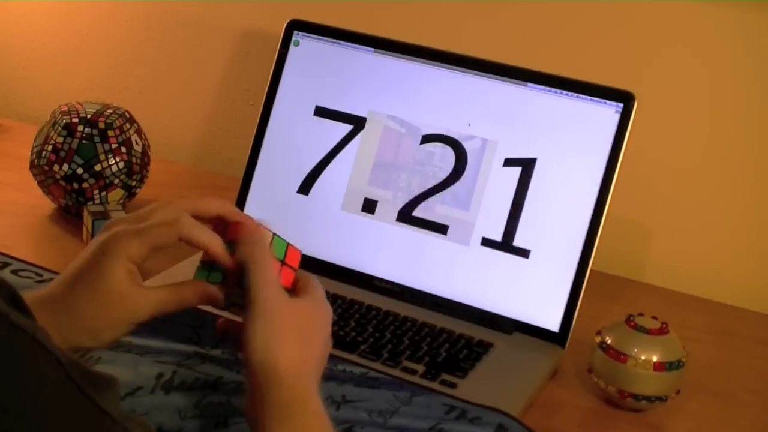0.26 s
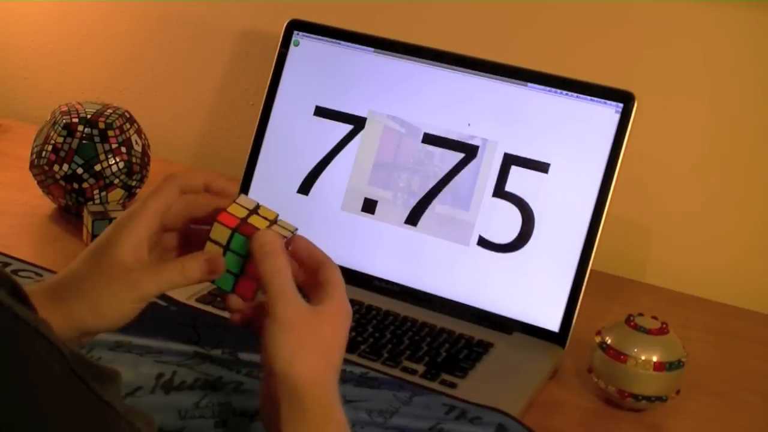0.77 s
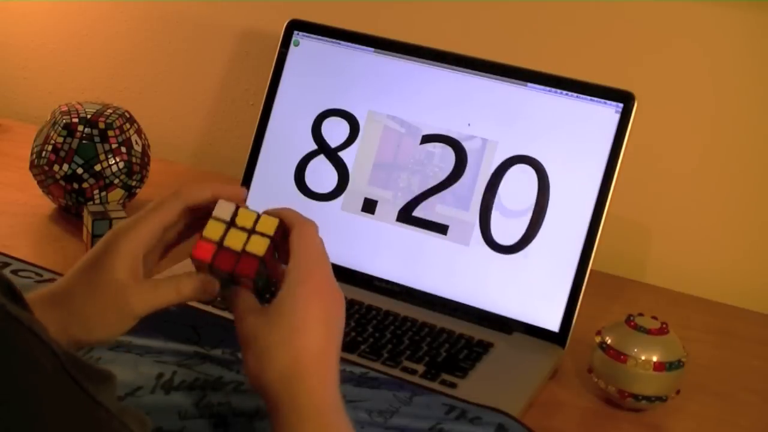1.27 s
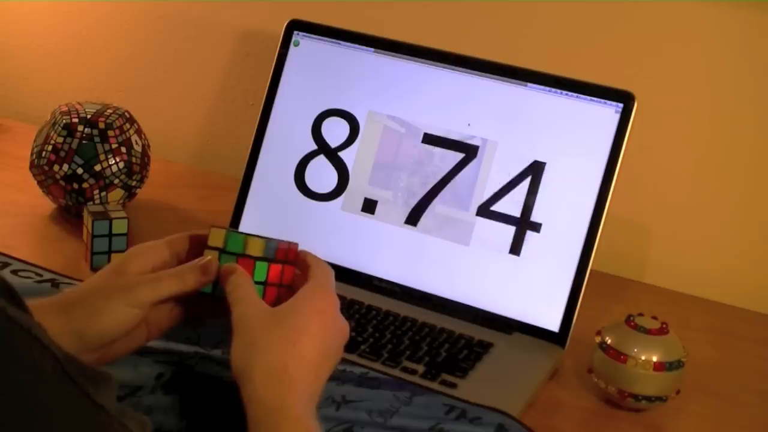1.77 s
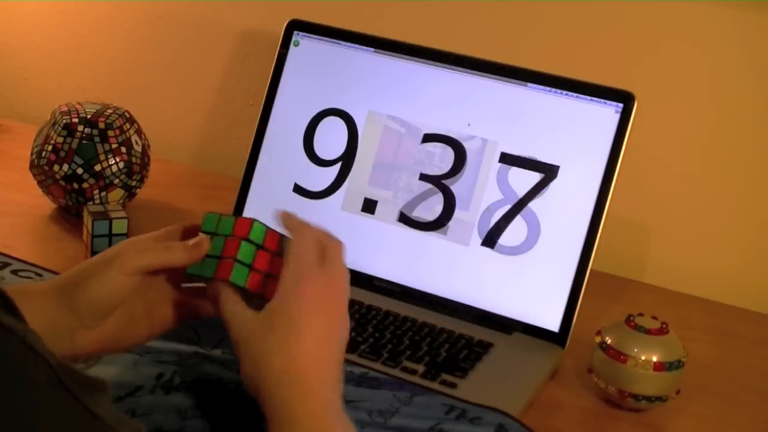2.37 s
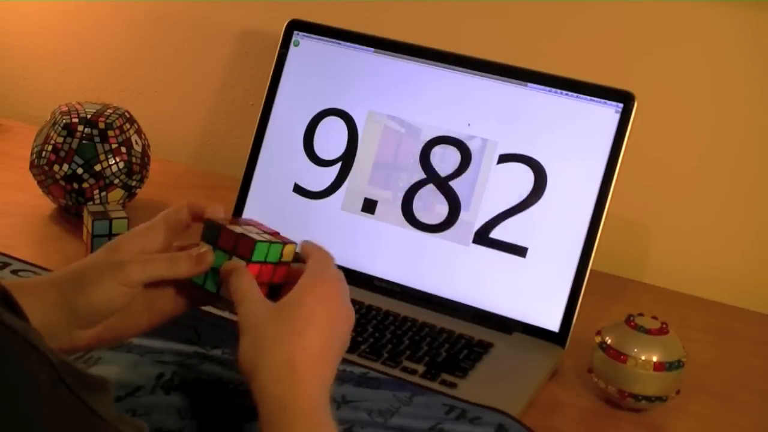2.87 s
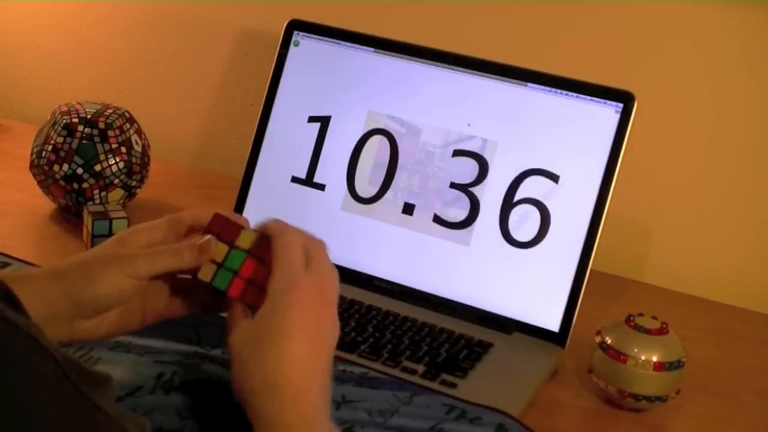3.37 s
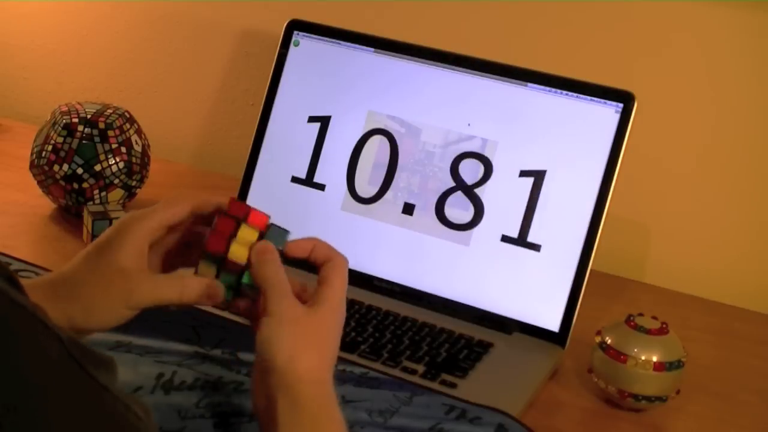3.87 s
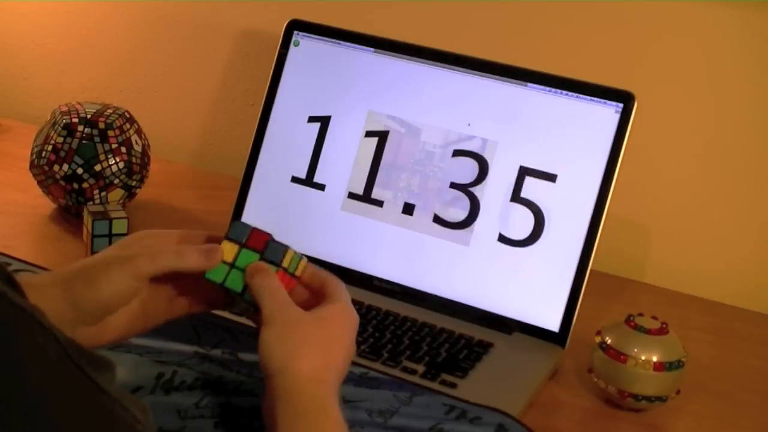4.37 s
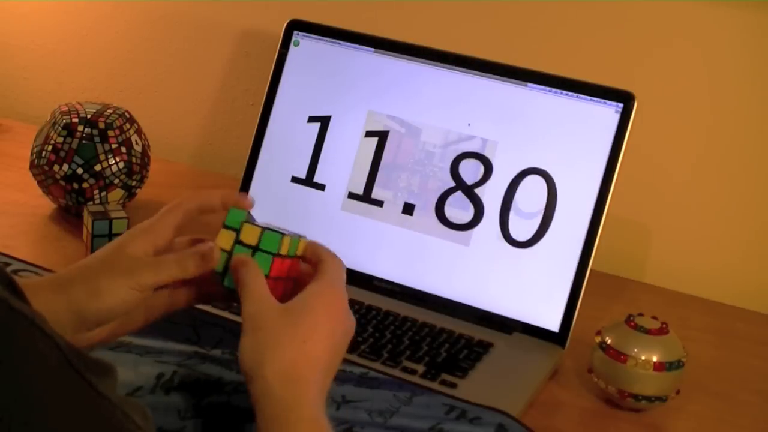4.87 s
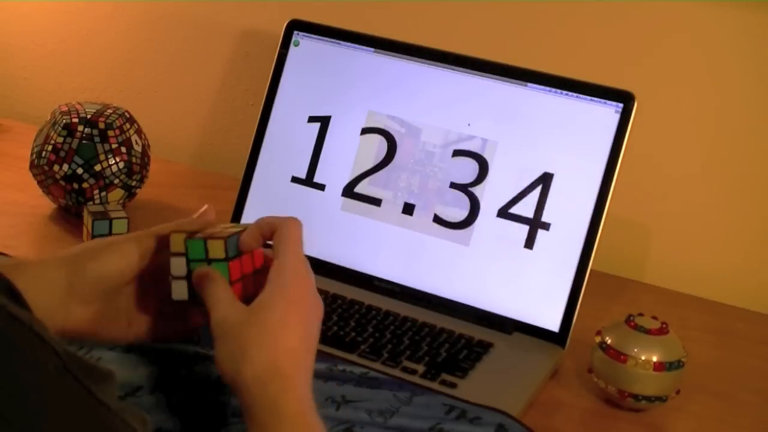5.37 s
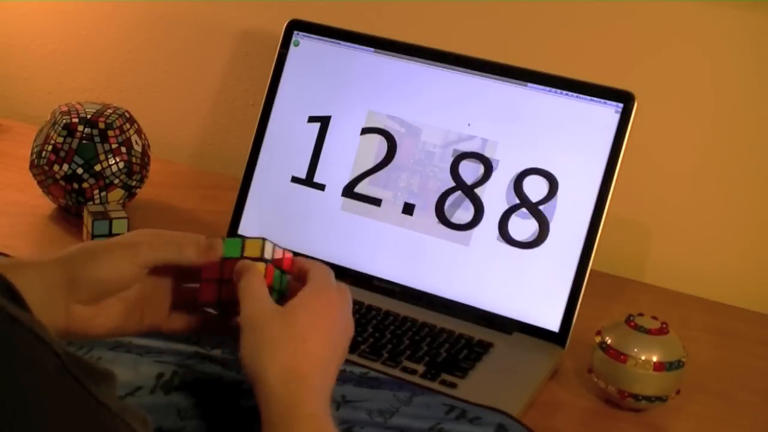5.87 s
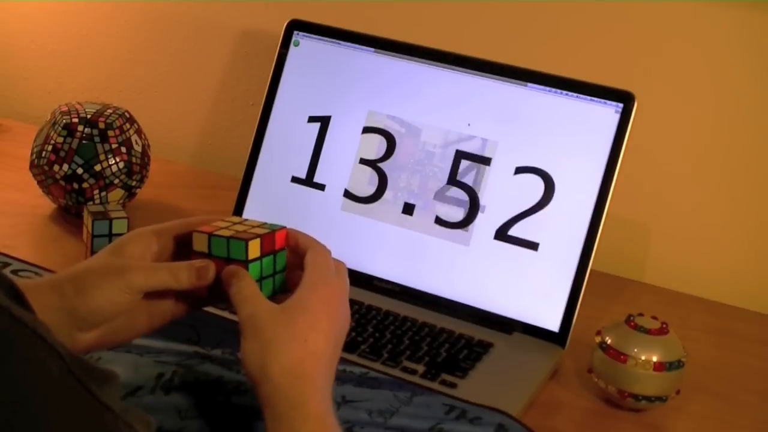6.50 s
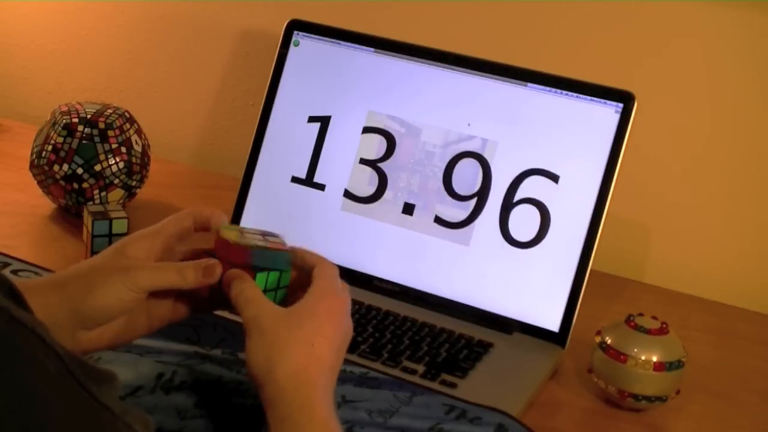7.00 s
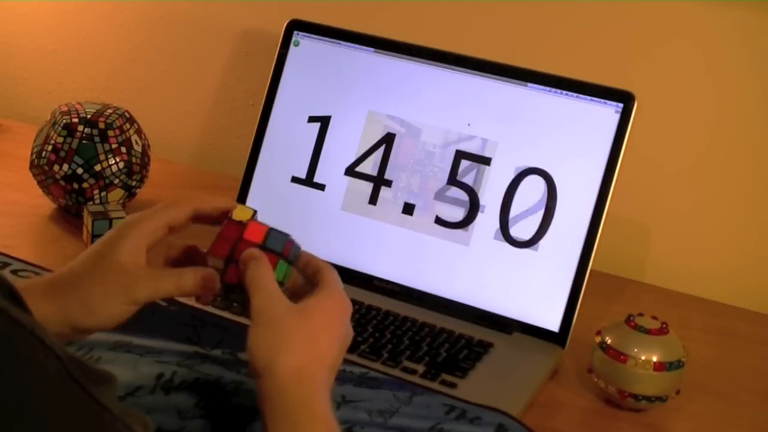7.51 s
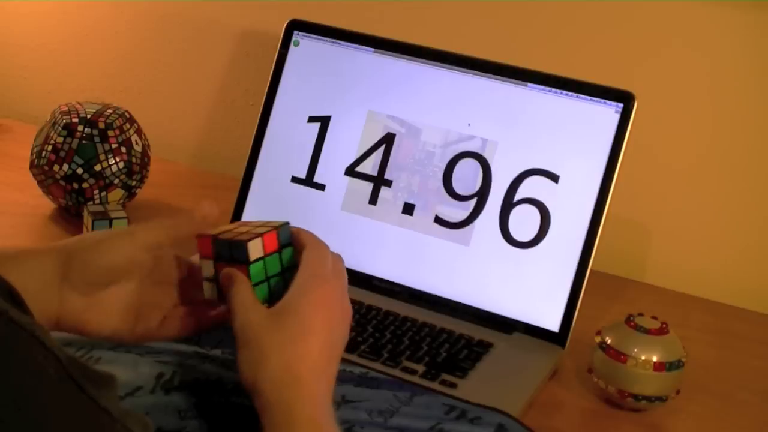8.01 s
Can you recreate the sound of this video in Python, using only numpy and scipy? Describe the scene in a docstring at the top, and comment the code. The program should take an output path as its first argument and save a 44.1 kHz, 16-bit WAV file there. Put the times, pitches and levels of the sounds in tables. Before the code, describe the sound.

Close to the microphone, hands turn a hollow plastic puzzle cube at a desk. Bright snaps and short gritty scrapes open the scene, then light handling leads to increasingly frequent runs of clacks, broken by brief pauses. A small, reflective room adds a short wash around each click. Soft hand bumps, faint low hum and quiet air lie underneath, and the clicking is still brisk at the end.

```python
"""Plastic puzzle cube at a desk

A plastic speedcube is turned in quick runs at a desk in a small, lively room. Noise bursts are the snaps of its
pieces, dense grains the gritty slide of its layers, narrow noise the squeak of a finger on the plastic. A
resonant filter is the hollow cube; mirrored echoes and a diffuse wash are the room. Soft hand bumps, a faint
hum with steady tones, and room air lie beneath."""
import sys
import numpy as np
from scipy import signal
from scipy.fft import rfft, irfft
from scipy.io import wavfile
from scipy.ndimage import uniform_filter1d

SR = 44100
rng = np.random.default_rng(int(sys.argv[2]) if len(sys.argv) > 2 else 0)


def wrap_up_sound(samples):
    """Save the sound to the file named by the first command line argument, as 16-bit audio."""
    columns = np.atleast_2d(samples).T
    # keep every value between -1 and 1, then stretch to whole-number steps
    tamed = np.clip(columns, -1, 1)
    steps = np.round(tamed * 32767).astype(np.int16)
    wavfile.write(sys.argv[1], SR, steps)


N = 363825
TIME = np.arange(N) / SR


def amp(db):
    """Logarithmic level: decibels become a linear gain."""
    return 10 ** (np.asarray(db) / 20)


def rms_one(x):
    """Normalisation of power: scale to an rms of 1."""
    return x / np.sqrt(np.mean(x ** 2) + 1e-20)


def curve_db(points, size):
    """Spectral envelope: (Hz, dB) points joined along log frequency, on the grid of `size` samples."""
    hz, db = np.transpose(points)
    grid = np.fft.rfftfreq(size, 1 / SR)
    return np.interp(np.log(grid + 1), np.log(hz), db)


def coloured(points, size):
    """Spectral shaping: white noise is weighted by the given spectrum."""
    spectrum = rfft(rng.standard_normal(size))
    return irfft(spectrum * amp(curve_db(points, size)), size)


def edge(x, hz, kind):
    """Second-order filtering: a low- or high-pass."""
    sos = signal.butter(2, min(hz, SR / 2 - 1), kind, fs=SR, output="sos")
    return signal.sosfilt(sos, x)


def band_noise(hz, width_hz, size):
    """Resonance: noise drives one damped mode; rms 1."""
    radius = np.exp(-np.pi * width_hz / SR)
    poles = [1, -2 * radius * np.cos(2 * np.pi * hz / SR), radius * radius]
    return rms_one(signal.lfilter([1, 0, -1], poles, rng.standard_normal(size)))


def decay(t, t60):
    """Exponential decay: amplitude falls 60 dB in t60 seconds."""
    return np.exp(-np.log(1000) * t / t60)


def add(track, s, sound):
    """Superposition: mix a sound in at s seconds."""
    at = max(int(s * SR), 0)
    track[at:at + len(sound)] += sound[:max(N - at, 0)]


# Pieces snapping against each other. Each row: start in seconds, relative level in dB,
# hollowness in dB (above 0 for a flat-on blow, below 0 for an edge).
SNAPS = [(0.0303, -11.5, 0), (0.104, -27.5, -3), (0.134, -23.5, 5), (0.2015, -4.5, 0.5), (0.237, -26, 4),
         (0.415, -25, -8), (0.445, -35, 0.5), (0.55, -31.5, -6), (0.672, -23, 0), (0.6838, -4, -5.5),
         (0.687, -3, 2), (0.802, -35.5, 13), (0.835, -17, 2), (0.991, -35, -28), (1.115, -40.5, -4),
         (1.299, -36, -8.5), (1.443, -35, -5), (1.577, -45.5, -3.5), (1.823, -34, -2), (1.855, -39.5, 3),
         (2.002, -21, 3), (2.313, -19, 4.5), (2.3415, -16, 2), (2.4275, -31, -11), (2.509, -35.5, -0.5),
         (2.594, -39.5, 2.5), (2.827, -24, -2), (2.855, -12.5, 5), (2.894, -4.5, -5), (2.903, -4, 4),
         (3.102, -30, -2), (3.195, -19, -7), (3.204, -9.5, -4.5), (3.249, -7, 1.5), (3.256, -8.5, -8),
         (3.263, -19.5, 9.5), (3.301, -10.5, -7), (3.304, -12, -0.5), (3.391, -26, 1), (3.397, -22.5, 3),
         (3.42, -19, 4), (3.466, -19.5, 3.5), (3.685, -18, -5), (3.724, -28, -2), (3.738, -24, 5),
         (3.83, -41.5, 4), (3.899, -38.5, 5), (3.963, -11, -3.5), (3.972, -12.5, 2), (3.98, -10.5, 3),
         (4.185, -46, 3.5), (4.238, -43, -2), (4.495, -31.5, 8), (4.532, -8, 1.5), (4.643, -31, -8),
         (4.7, -39.5, 13), (4.745, -12, 2.5), (4.7619, -1, 3), (4.766, -19.5, 10), (4.911, -21, 2.5),
         (4.922, -19, 2), (4.9875, -8.5, 1), (5.03, -4, 7), (5.035, -12, -18), (5.27, -27, 5.5),
         (5.322, -33.5, 7), (5.369, -32, 10.5), (5.4085, -13, -15), (5.415, -7, 1), (5.589, -40.5, 9.5),
         (5.653, -15.5, 2.5), (5.658, -9.5, -1.5), (5.895, -26, 3), (5.995, -27, 0), (6.0373, -40.5, 12),
         (6.064, -9.5, 3.5), (6.1325, -10.5, -7), (6.1375, -17, 8), (6.173, -13.5, 5.5), (6.245, -9.5, 0),
         (6.692, -28.5, -7.5), (6.816, -32, -2), (6.841, -30, 3), (6.856, -13.5, -5), (6.87, -21, 4),
         (6.957, -30, -9), (6.994, -16, -2.5), (7.101, -12, -2), (7.2205, -27, -9), (7.545, -23.5, -4),
         (7.593, -35, 3), (7.61, -24.5, -2.5), (7.83, -24, -10), (7.86, -5, 0), (7.8855, -19.5, 5.5),
         (7.907, -6, -7), (8.1292, -15, 2), (8.163, -6, -6), (8.168, -7, 0), (8.184, -19.5, 5),
         (8.2246, -3, -10), (8.2315, -5.5, -1)]
# a harder snap is brighter: the hollow knock grows by only a share of each dB
KNOCK_DB, KNOCK_FOLLOWS = -35.5, 0.61
# the knock's pitch rises with the blow: Hz at 0 dB, octaves per dB, chance spread in octaves
KNOCK_HZ, KNOCK_OCTAVES_PER_DB, KNOCK_SPREAD_OCTAVES = 1190, 0.07, 0.22


def clicks(snap_db=-7.0, chatter_t60=0.0075, scatter_db=-12.0, scatter_t60=0.025,
           lead_db=-18.0, lead_s=0.0033, ring_db=-13.0, ring_width_hz=1100,
           knock_t60=0.028, knock_width_hz=1000, rise_s=0.00024, snap_hz=1800, size=2400):
    """Impact excitation: an edge drags, then snaps home in a short chatter that desk and laptop scatter.

    Each piece rings and knocks at its own pitch."""
    force = np.zeros(N)
    before = TIME[size // 6]
    t = TIME[:size] - before  # time since the impact
    after = np.maximum(t, 0)
    rise = 1 - np.exp(-after / rise_s)
    drag = amp(lead_db) * np.exp(-np.abs(t) / lead_s)
    scatter = amp(scatter_db) * decay(after, scatter_t60)
    snap_shape = drag + rise * np.hypot(decay(after, chatter_t60), scatter)
    snap_rms = np.sqrt(np.mean(snap_shape ** 2))
    knock_shape = drag + rise * decay(after, knock_t60)
    for s, db, hollow_db in SNAPS:
        octaves = KNOCK_OCTAVES_PER_DB * db + KNOCK_SPREAD_OCTAVES * rng.standard_normal()
        ring = amp(ring_db) * band_noise(rng.uniform(3500, 9240), ring_width_hz, size)
        burst = (rng.standard_normal(size) + ring) * snap_shape
        snap = snap_rms * rms_one(edge(burst, snap_hz, "high"))
        knock = rms_one(band_noise(KNOCK_HZ * 2 ** octaves, knock_width_hz, size) * knock_shape)
        knock_gain = amp(KNOCK_DB + KNOCK_FOLLOWS * db + hollow_db)
        add(force, s - before, amp(snap_db + db) * snap + knock_gain * knock)
    return force


def grains(per_s, spread_db, t60, size=512):
    """Granular friction: tiny catches of uneven strength at random moments, evened out to a steady level."""
    strength = amp(spread_db * np.minimum(rng.exponential(1, N), 3))
    catches = strength * (rng.random(N) < per_s / SR)
    t = TIME[:size]
    grain_power = t * decay(t, t60) ** 2
    power = np.abs(signal.fftconvolve(catches ** 2, grain_power)[:N]) + 1e-10
    return rng.standard_normal(N) * np.sqrt(power / uniform_filter1d(power, size=1800))


# Layers flicked round. Each row: start in seconds, end in seconds, relative force in dB.
FLICKS = [(0.143, 0.214, -41.5), (0.192, 0.242, -33), (0.745, 0.84, -45.5), (1.826, 1.865, -60.5),
          (1.987, 2.033, -42), (2.296, 2.336, -36.5), (2.861, 2.97, -34), (3.204, 3.283, -34),
          (3.675, 3.764, -49.5), (3.949, 3.991, -42.5), (4.508, 4.55, -36), (4.752, 4.755, -33.5),
          (4.905, 4.926, -43.5), (5, 5.05, -46.5), (5.89, 5.917, -44), (6.077, 6.175, -33.5),
          (6.187, 6.232, -45), (6.834, 6.884, -45), (7.015, 7.142, -47), (7.869, 7.921, -30.5),
          (8.158, 8.253, -36)]
# Shifting grip of the fingers, under which loose layers scrape lightly.
# Each row: time in seconds, relative force in dB.
GRIP_FORCE = [(0, -52.5), (0.35, -66), (0.58, -59), (0.66, -46), (1.0, -66.5), (1.72, -77), (2.6, -62.5),
              (2.76, -73), (3.18, -51), (3.6, -66), (3.9, -60.5), (4.34, -81), (4.5, -57), (4.87, -59),
              (5.22, -66.5), (5.3, -51), (5.6, -51), (5.85, -60.5), (6.62, -82), (6.84, -67.5), (7.2, -59),
              (7.41, -89), (7.46, -57.5), (7.68, -58), (8.05, -65.5)]
# the hollow rub grows more slowly than the grit
RUB_DB, RUB_FOLLOWS = -10, 0.82
# the finger takes up the slack before a flick: length in s, level reached in dB relative to the turn
SLACK_S, SLACK_DB = 0.044, -15


def slides(grit_db=0.0, ramp_s=0.0017, swell_db=2.0, grit_hz=2000, rub_hz=1800,
           light_per_s=110, hard_per_s=550):
    """Sliding friction: a layer scrapes harder as it gathers speed; one force drives grit, rub and grain rate."""
    force = amp(np.interp(TIME, *np.transpose(GRIP_FORCE)))
    for start, end, db in FLICKS:
        length = max(end - start, ramp_s)
        t = TIME[:int(length * SR)]
        slack = np.linspace(0, amp(db + SLACK_DB), int(SLACK_S * SR))
        ramps = np.clip(np.minimum(t, length - t) / ramp_s, 0, 1)
        add(force, start - SLACK_S, slack)
        add(force, start, ramps * amp(db + swell_db * (t / length - 1.0)))
    # a light touch gives lone ticks, a hard turn a dense rattle
    rate = light_per_s + hard_per_s * np.sqrt(force / force.max())
    scrape = grains(per_s=rate, spread_db=3.5, t60=0.0042)
    grit = amp(grit_db) * force * rms_one(edge(scrape, grit_hz, "high"))
    rub = amp(RUB_DB) * force ** RUB_FOLLOWS * rms_one(edge(scrape, rub_hz, "low"))
    return grit + rub


# A finger squeaking on the cube for a moment. Each row: start in seconds, end in seconds, pitch in Hz, relative
# level in dB.
FINGER_SQUEAKS = [(1.995, 2.017, 895, -45), (2.855, 2.867, 1110, -27.5), (3.414, 3.441, 713, -38)]


def groans(width_hz=70):
    """Stick-slip: a fingertip sticks and slips on the plastic at an unsteady rate, heard as a narrow band of
    noise."""
    force = np.zeros(N)
    for start, end, hz, db in FINGER_SQUEAKS:
        size = max(int((end - start) * SR), 64)
        groan = band_noise(hz, width_hz, size) * signal.windows.tukey(size)
        add(force, start, amp(db) * groan)
    return force


# Broad response of the plastic shell. Each row: frequency in Hz, gain in dB.
SHELL_RESPONSE = [(60, -23), (200, -28.5), (380, -10.5), (530, -13), (700, -4.5), (1000, -3.5), (1500, -2),
                  (2500, 1), (5000, 4), (7600, 6.5), (9000, 3.5), (10500, -5), (12400, -8), (15000, -28)]
# Resonances of the hollow cube over the desk. Each row: centre in Hz, width in Hz,
# height in dB of that peak alone above the broad response.
CUBE_MODES = [(602.5, 16, 11.5), (687.6, 6.5, 7.5), (720.4, 26.3, 14), (809, 19, 10.5), (877, 17.2, 6),
              (968, 17, 6.5), (1015.6, 21, 9.5), (1207, 27, 5.5), (1284, 42, 5), (1679, 29, 5),
              (1840, 16, 4), (2160, 49, 4), (3000, 80, 3.5)]


def cube(force, size=8192):
    """Modal resonance: the shell and its modes act as one causal, minimum-phase response."""
    hz = np.fft.rfftfreq(size, 1 / SR)
    peaks = 0
    for centre, width, db in CUBE_MODES:
        peaks = peaks + (amp(db) ** 2 - 1) / (1 + (2 * (hz - centre) / width) ** 2)
    magnitude = amp(curve_db(SHELL_RESPONSE, size)) * np.sqrt(np.maximum(1 + peaks, .1))
    # folding the cepstrum onto positive time gives minimum phase
    cepstrum = irfft(np.log(magnitude))
    cepstrum[1:size // 2] *= 2
    cepstrum[size // 2 + 1:] = 0
    response = irfft(np.exp(rfft(cepstrum)))
    return signal.fftconvolve(force, response)[:N]


# Colour of the echoes. Each row: frequency in Hz, relative level in dB.
ECHO_COLOUR = [(100, 8), (700, -2.5), (2000, 2.5), (5000, -1), (8000, -4), (11000, -7.5), (15000, -9.5)]
# Left-right difference of the echoes. Each row: frequency in Hz, relative level in dB.
ECHO_WIDTH = [(100, -9.5), (400, -24), (720, -14), (1500, -8), (3500, -15.5), (6000, -15), (8700, -5),
              (11000, -5.5), (15000, -17)]


def room(x, wash_db=-2.0, mirror_db=-5.5, tail_t60=0.3, tail_s=0.0005, size=22050):
    """Reflection and diffusion: smooth walls mirror each sound; clutter turns band energy into a wash.

    Gives mid and side."""
    t = TIME[:size]
    linger = rms_one(decay(t, tail_t60) * (1 - np.exp(-t / tail_s))) / np.sqrt(size)
    colours = (ECHO_COLOUR, ECHO_WIDTH)
    mirrored = [signal.fftconvolve(x, linger * coloured(colour, size))[:N] for colour in colours]
    out = amp(mirror_db) * np.array(mirrored)
    out[0] += x  # direct sound
    edges_hz = [100, 550, 900, 1500, 2800, 5500, 9500, 19000]
    # neighbouring bands alternate between two unrelated washes
    washes = [np.array([coloured(colour, N) for colour in colours]) for _ in range(2)]
    for k, (low, high) in enumerate(zip(edges_hz, edges_hz[1:])):
        band = signal.butter(2, [low, high], "band", fs=SR, output="sos")
        energy = np.abs(signal.fftconvolve(signal.sosfilt(band, x) ** 2, linger ** 2)[:N])
        level = np.sqrt(energy * SR / 2 / (high - low))
        out += amp(wash_db) * level * signal.sosfilt(band, washes[k % 2])
    return out


# Soft bumps of the hands. Each row: start in seconds, relative level in dB.
HAND_BUMPS = [(2.638, -53), (4.413, -59), (5.024, -47.5), (5.18, -54), (7.761, -56.5)]


def bumps(level_db=-11.5, low_hz=150, high_hz=280, t60=0.3, size=8192):
    """Damped impact: a padded blow excites only a dull, low band."""
    out = np.zeros(N)
    for s, db in HAND_BUMPS:
        burst = rng.standard_normal(size) * decay(TIME[:size], t60)
        thud = edge(edge(burst, low_hz, "high"), high_hz, "low")
        add(out, s, amp(db + level_db) * rms_one(thud))
    return out


# Room air common to both ears. Each row: frequency in Hz, relative level in dB per Hz.
AIR_COMMON = [(20, -23.5), (60, -3), (150, -4.5), (300, -5.5), (700, -7.5), (1000, -13.5), (3000, -15),
              (8000, -22.5), (12000, -31.5), (16000, -41.5)]
# Room air opposed between the ears. Each row: frequency in Hz, relative level in dB per Hz.
AIR_OPPOSED = [(20, -41), (60, -10.5), (190, -3), (400, -4), (700, -8), (1200, -12.5), (3000, -20),
               (6000, -30.5), (9000, -28), (15000, -49)]
# Mains hum and faint steady tones. Each row: frequency in Hz, common rms level in dB,
# opposed rms level in dB.
STEADY_TONES = [(121, -67.5, -72), (165, -79.5, -83), (718, -77.5, -106.5), (8000, -99.5, -84)]


def background(mid_db=-62.5, side_db=-56.5):
    """Stationary noise and tones: steady room air with hum, its common and opposed parts set apart."""
    mid = amp(mid_db) * rms_one(coloured(AIR_COMMON, N))
    side = amp(side_db) * rms_one(coloured(AIR_OPPOSED, N))
    for hz, common_db, opposed_db in STEADY_TONES:
        phase = 2 * np.pi * (hz * TIME + rng.random())
        mid = mid + np.sqrt(2) * amp(common_db) * np.sin(phase)
        side = side + np.sqrt(2) * amp(opposed_db) * np.cos(phase)
    return np.array([mid + side, mid - side])


def scene():
    """Source and filter: the shell colours direct sound and echoes alike; all sits a little right of centre."""
    mid, side = map(cube, room(clicks() + slides() + groans()))
    sound = np.array([mid + side, mid - side]) + bumps() + background()
    return sound * amp([[-.15], [.15]])  # left, right in dB


CUTOFF_HZ = 16700


def record(dry):
    """Band limiting: the top is cut steeply."""
    return signal.sosfilt(signal.cheby2(14, 70, CUTOFF_HZ, fs=SR, output="sos"), dry)


dry = scene()
out = record(dry)
wrap_up_sound(out)
```